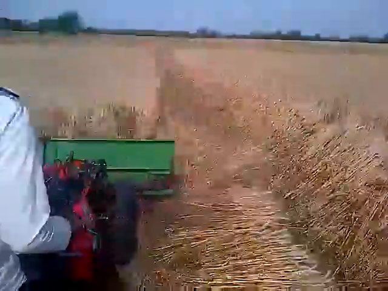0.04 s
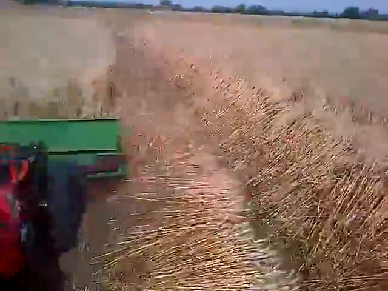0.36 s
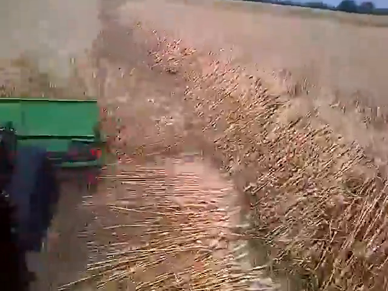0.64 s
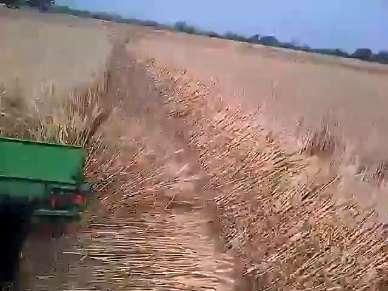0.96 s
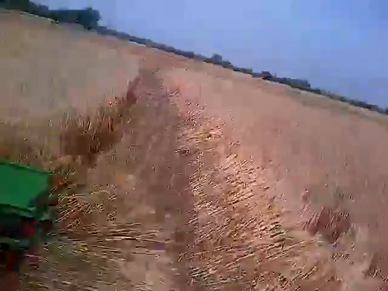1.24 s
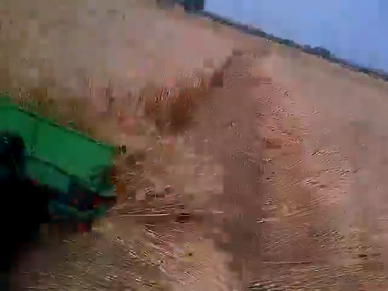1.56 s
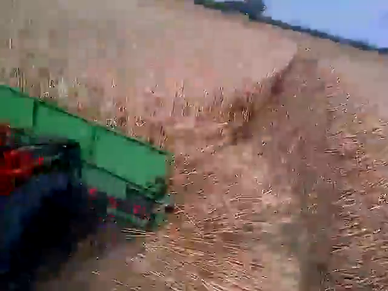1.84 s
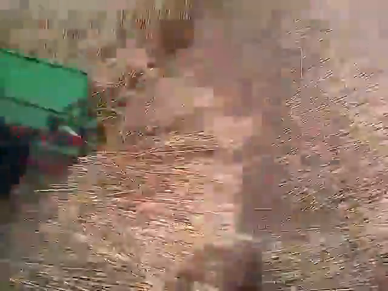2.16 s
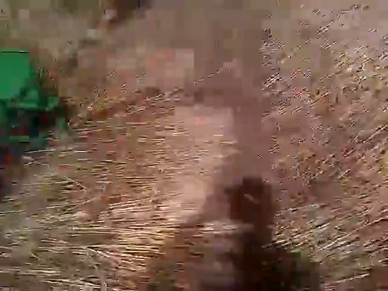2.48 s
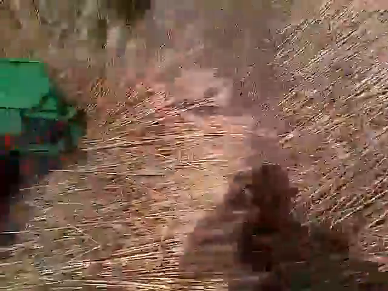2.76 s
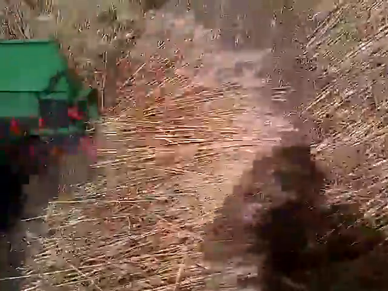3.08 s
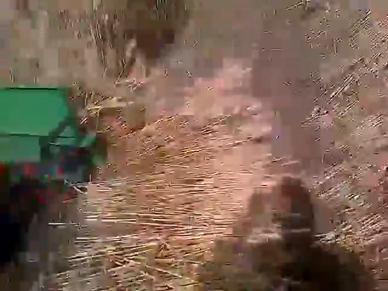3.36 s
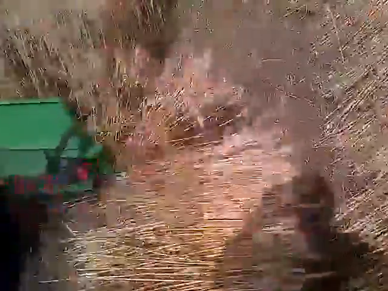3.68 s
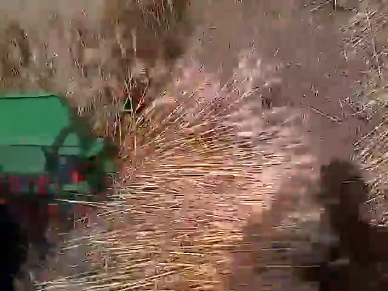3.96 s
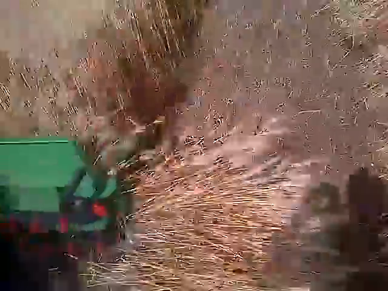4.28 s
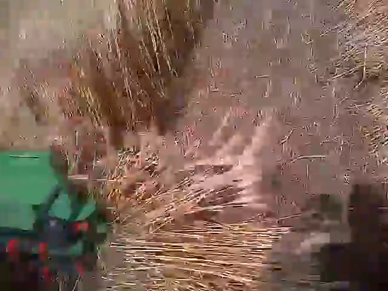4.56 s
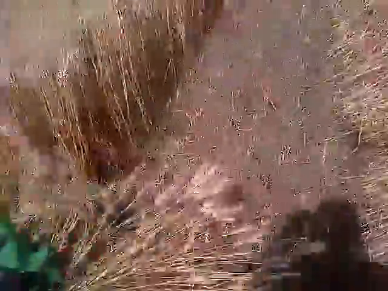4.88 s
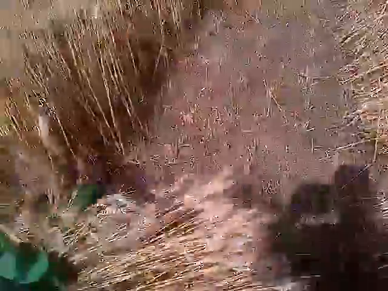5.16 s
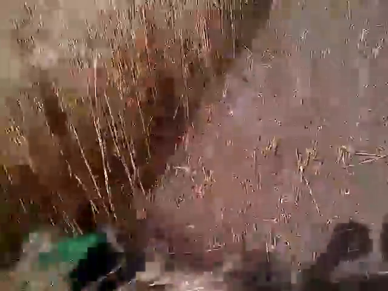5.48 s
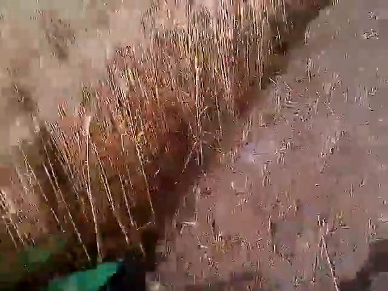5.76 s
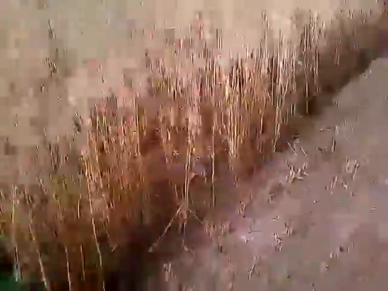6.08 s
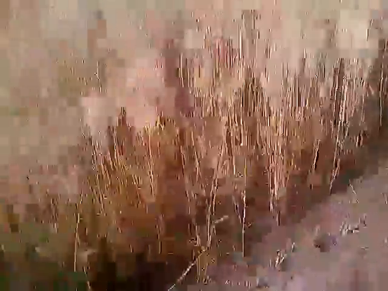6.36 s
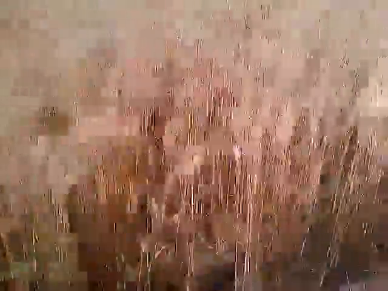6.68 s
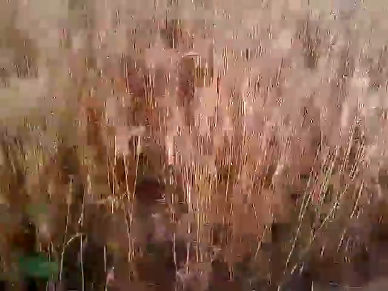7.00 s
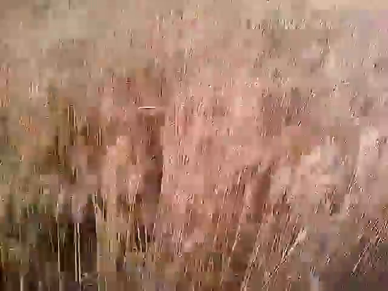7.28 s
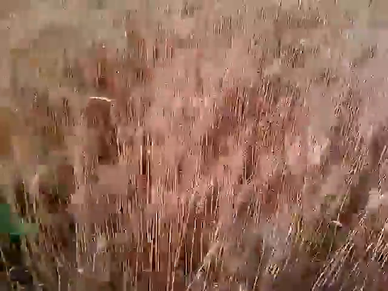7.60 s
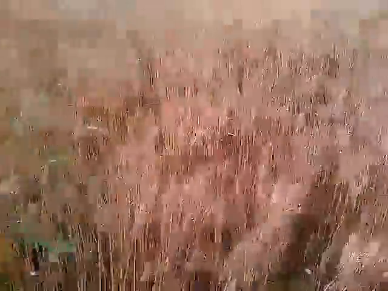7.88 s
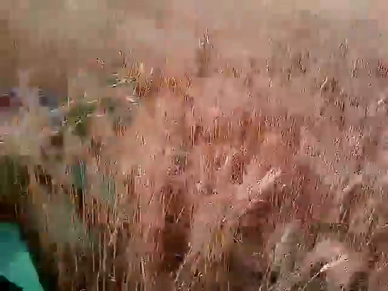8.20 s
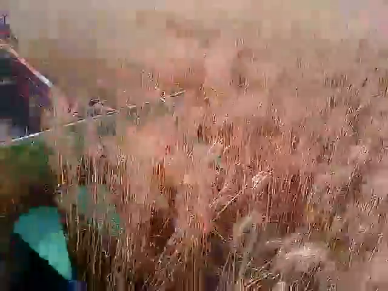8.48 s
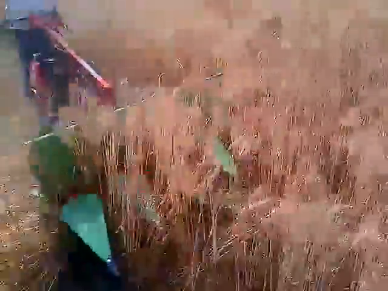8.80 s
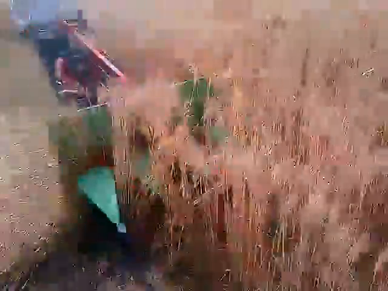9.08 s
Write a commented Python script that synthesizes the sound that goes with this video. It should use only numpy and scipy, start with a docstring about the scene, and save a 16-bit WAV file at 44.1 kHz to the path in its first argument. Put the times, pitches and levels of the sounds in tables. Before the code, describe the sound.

Heard from a small microphone carried close beside it, a diesel reaper pounds away with a rapid, even knock and exhaust throb. Chains and sheet-metal guards rattle continuously while dry straw hisses across the blade. Past the middle, standing wheat brushes the microphone in short crackles. The highs then drop away briefly, as though the microphone were covered, and return as the machine keeps running in the field.

```python
"""Walking past a reaper in dry wheat.

The microphone is carried along a walk-behind reaper, from engine to cutter bar, passing most parts within
a metre. The single-cylinder diesel fires 23 times a second: knock, piston slap, exhaust puff, intake pop.
Covers ring, chains and guards rattle, and straw hisses over the knife.
Late in the walk stalks brush the microphone, and the sound is muffled for about a second."""
import sys
import numpy as np
from scipy import signal
from scipy.fft import rfft, irfft, next_fast_len
from scipy.io import wavfile
from scipy.ndimage import uniform_filter1d

SR = 44100
rng = np.random.default_rng(int(sys.argv[2]) if len(sys.argv) > 2 else 0)


def store_wav(level_fs):
    """Save 16-bit WAV to argv[1]."""
    pcm = np.round(np.clip(np.atleast_2d(level_fs), -1, 1) * 32767)
    wavfile.write(sys.argv[1], SR, pcm.T.astype(np.int16))


N = 407484
TIME = np.arange(N) / SR
START_S = .036  # silent until here
WALK_M_PER_S = .3


def gain_of(db):
    """Decibels to amplitude."""
    return 10 ** (np.asarray(db) / 20)


def evened(x):
    """Scales to rms 1."""
    return x / np.sqrt(np.mean(x ** 2) + 1e-20)


def follow(curve):
    """A curve of (seconds, value) points, at every sample."""
    return np.interp(TIME, *np.transpose(curve))


def swell(s, half_length):
    """A smooth rise and fall around s seconds, 1 at the top."""
    return np.exp(-((TIME - s) / half_length) ** 2)


def near(place, distance):
    """Sound falls as 1 / distance while the microphone passes a part; 1 when closest."""
    return distance / np.hypot(distance, WALK_M_PER_S * TIME - place)


def surge(depth_db, hz):
    """A gain that wanders at random, at rates up to hz, as when the crop feeds unevenly."""
    coarse = TIME[::256]
    wander = sum(np.sin(2 * np.pi * (f * coarse + rng.random())) for f in np.geomspace(hz / 8, hz, 20))
    return gain_of(depth_db * np.interp(TIME, coarse, evened(wander)))


def colour(x, points):
    """Causal filter whose spectrum follows the (Hz, dB) points; rms 1."""
    size = next_fast_len(N + 8192)
    hz, db = np.transpose(points)
    bin_hz = abs(np.fft.fftfreq(size, 1 / SR))
    log_gain = np.log(gain_of(np.interp(np.log(bin_hz + 1), np.log(hz), db)))
    minimum_phase = np.exp(signal.hilbert(log_gain).conj())[:size // 2 + 1]
    return evened(irfft(rfft(x, size) * minimum_phase, size)[:N])


def ring(x, modes):
    """A bank of (Hz, width in Hz, dB) resonances; rms 1."""
    return evened(sum(gain_of(db) * signal.lfilter(*signal.iirpeak(hz, hz / width, SR), x)
                      for hz, width, db in modes))


def band(x, hz, width):
    """A single resonance; rms 1."""
    return ring(x, [(hz, width, 0)])


def sing(drive, modes):
    """Resonances that each swell and fade along their own stretch of the walk."""
    return sum(gain_of(db) * swell(s, half_length) * band(band(drive, hz, width), hz, 5 * width)
               for hz, width, db, s, half_length in modes)


def grains(per_s, spread_db):
    """Random tiny impacts, mostly weak and a few strong; rms 1."""
    size = gain_of(spread_db * np.minimum(rng.exponential(1, N), 4))
    return evened(size * rng.choice([-1, 1], N) * (rng.random(N) < per_s / SR))


def recurring(cycles, repeat, count=24):
    """Noise of which a share repeats with every engine cycle, its pattern renewed over count cycles."""
    steps = 1900  # per cycle
    pattern = uniform_filter1d(rng.standard_normal((int(cycles[-1]) + 2, steps)), count, axis=0, mode="wrap")
    locked = evened(pattern[cycles.astype(int), (cycles % 1 * steps).astype(int)])
    return np.sqrt(repeat) * locked + np.sqrt(1 - repeat) * rng.standard_normal(N)


def stroke(cycles, at, rise, decay, uneven_db):
    """The envelope of one uneven burst a cycle; at, rise and decay are shares of the cycle."""
    since = cycles - at + 2
    strength = gain_of(uneven_db * rng.standard_normal(256))[since.astype(int)]
    return strength * (1 - np.exp(-(since % 1) / rise)) * np.exp(-(since % 1) / decay)


def tap(cycles, at, scatter, uneven_db):
    """One sharp impact a cycle; its place in the cycle and its strength vary a little."""
    slip, size = rng.standard_normal((int(cycles[-1]), 2)).T
    place = np.searchsorted(cycles, np.arange(len(slip)) + at + scatter * slip)
    return np.bincount(place, gain_of(uneven_db * size), N + 1)[:N]


def puffing(cycles):
    """Four gusts of gas a cycle: the valve cracks open, the piston pushes, and the pipe surges twice."""
    # Each row: place in the cycle from 0 to 1, strength in dB.
    puffs = [(.56, 0), (.76, 0), (.97, -4), (.16, -5)]
    return sum(gain_of(db) * stroke(cycles, at, rise=.015, decay=.055, uneven_db=.7) for at, db in puffs)


def lull(cycles):
    """The running gear quietens as the piston slows against compression, just before the knock."""
    return 1 - .33 * np.exp(-((cycles % 1 - .35) / .09) ** 2)


def sweep(cycles):
    """The knife shears on its way out and, more weakly, on its way back."""
    out = stroke(cycles, at=.94, rise=.02, decay=.13, uneven_db=1.8)
    return out + .55 * stroke(cycles, at=.24, rise=.015, decay=.09, uneven_db=1.8)


def brushes():
    """Standing stalks brush past the microphone: each catches suddenly and scrapes off in a dry crackle."""
    # Each row: start in seconds, decay in seconds, centre in Hz, level in dB.
    stalks = [(5.985, 0.055, 3350, -20), (6.095, 0.097, 3070, -21.5), (6.27, 0.047, 2430, -18),
              (6.84, 0.35, 1880, -24.5), (7.03, 0.052, 1680, -24), (7.326, 0.04, 2770, -19),
              (7.365, 0.058, 2740, -21), (7.465, 0.019, 2970, -19.5), (7.563, 0.056, 1620, -18.5),
              (7.735, 0.028, 1670, -20), (7.866, 0.095, 1060, -26.5), (8.171, 0.033, 1700, -44),
              (8.35, 0.037, 1540, -28)]
    rise_s = .001
    scrape = grains(per_s=1800, spread_db=3) + .5 * rng.standard_normal(N)
    out = np.zeros(N)
    for s, decay, hz, db in stalks:
        since = np.maximum(TIME - s, 0)
        envelope = (1 - np.exp(-since / rise_s)) * np.exp(-(since / decay) ** 2)
        out += gain_of(db) * envelope * band(band(scrape, hz, hz / 2), hz, hz / 2)
    return out


def flicks():
    """Stalks flick the microphone itself, each with a dry tick of a few milliseconds."""
    # Each row: start in seconds, relative strength in dB.
    stalks = [(6.193, -4), (6.197, -5), (6.681, -15)]
    spectrum = [(30, -13), (300, -13), (1500, 13), (4000, -4), (7500, -14), (9000, -46)]
    push = sum(gain_of(db) * (TIME >= s) * np.exp(-abs(TIME - s) / .0015) for s, db in stalks)
    return .7 * np.std(push) * colour(push * rng.standard_normal(N), spectrum)


def straw(cycles, blows):
    """Dry stalks snap and slide over the knife."""
    # Each row: frequency in Hz, relative level of the hiss in dB.
    spectrum = [(1500, -39), (3200, -4), (4100, -10.5), (4800, -4), (5650, -4.5), (5800, -11.5),
                (6600, -13.5), (7100, -21), (7700, -46)]
    slide = (.75 + .7 * sweep(cycles)) * rng.standard_normal(N)
    crackle = slide + .45 * grains(per_s=1500, spread_db=2.8)
    return colour(crackle * surge(depth_db=1.5, hz=20) + .16 * blows, spectrum)


def knife(cycles):
    """The knife steel rubs in its guides with a thin, sustained squeal that swells on each sweep."""
    # Each row: pitch and width in Hz, level in dB, middle and half length in seconds.
    squeals = [(5420, 25, -39, .28, .15), (5425, 35, -34, .72, .08), (5680, 50, -38, .7, .8),
               (5430, 30, -41, 1.3, .2), (5520, 110, -31.5, 2.94, .15), (5670, 50, -39.5, 4.0, 1.2),
               (5190, 35, -41, 4.9, 1.2), (5420, 30, -40, 4.4, .8), (5520, 50, -40, 4.0, .9)]
    return sing((1 + .7 * sweep(cycles)) * recurring(cycles, repeat=.5), squeals)


def hums(cycles):
    """The tailpipe and a cover hum on multiples of the firing rate and throb with the gas flow."""
    # Each row: multiple of the firing rate, level in dB, middle and half length in seconds.
    notes = [(16, -28.5, 3.5, .4), (16, -32, 4.3, .6), (16, -37, 6.0, 1.1), (17, -34.5, 3.9, 1.5),
             (28, -38, 6.0, 1.6), (31, -37, 5.6, 1.8), (53, -39.5, 1.4, .6), (53, -37.5, 4.3, 1.5)]
    throb = 1 + .4 * np.cos(2 * np.pi * (cycles - .85))
    out = np.zeros(N)
    for multiple, db, s, half_length in notes:
        tone = throb * np.sin(2 * np.pi * multiple * cycles) * surge(depth_db=1, hz=5)
        out += gain_of(db) * swell(s, half_length) * evened(tone)
    return out


def frame(cycles, blows):
    """The frame drones under the engine's blows and the churning drive."""
    # Each row: frequency in Hz, relative level of the drone in dB.
    spectrum = [(200, -41), (400, -20), (540, -5), (645, 2), (700, -4), (820, 2), (950, 0.5), (1100, 1),
                (1400, -19), (2500, -42.5)]
    return colour(recurring(cycles, repeat=.42) + .22 * blows, spectrum)


def cutter_table(cycles):
    """The broad cutter table drones as crop is dragged across it; the drone swells briefly at moments."""
    # Each row: resonance and its width in Hz, relative level in dB.
    modes = [(406, 256, 3), (513, 140, -19)]
    # Each row: time in seconds, rise in dB.
    swells = [(1.17, 10), (3.56, 7), (5.7, 6.5), (7.57, 3), (8.87, 3), (9.07, 3.5), (9.2, 2.5)]
    level = gain_of(sum(db * swell(s, .05) for s, db in swells))
    shaking = (puffing(cycles) + .8) * recurring(cycles, repeat=.22)
    return level * band(ring(shaking, modes), 404, 180)


def chains(cycles, blows):
    """Chain links and tappets rattle, shaken by each firing, and set the sprockets ringing."""
    # Each row: frequency in Hz, relative level of the rattle in dB.
    spectrum = [(900, -34.5), (1800, -19), (2300, -0.5), (2900, 1), (3600, -4.5), (4200, -7.5),
                (5500, -32.5), (7500, -45)]
    # Each row: resonance and its width in Hz, relative level in dB.
    sprockets = [(2560, 91, 7.5), (2990, 220, 0), (3490, 560, 2.5)]
    # Hard rattles of the conveyor chain. Each row: start in seconds, dB over its usual clinking.
    clanks = [(4.085, 12), (5.389, 8)]
    tappets = stroke(cycles, at=.97, rise=.03, decay=.17, uneven_db=2)
    links = (.93 + .4 * tappets) * recurring(cycles, repeat=.35) + .5 * grains(per_s=700, spread_db=4.5)
    rattle = colour(links * lull(cycles) * surge(depth_db=.8, hz=16) + .55 * blows, spectrum)
    jolts = 1 + sum(gain_of(db) * (TIME >= s) * np.exp(-abs(TIME - s) / .028) for s, db in clanks)
    clinks = band(ring(jolts * grains(per_s=260, spread_db=3), sprockets), 3280, 1500)
    return evened(rattle + .52 * clinks)


def guards(cycles):
    """Knife and conveyor lugs clatter against loose sheet-metal guards, which at moments shake harder."""
    # Each row: resonance and its width in Hz, relative level in dB.
    modes = [(1120, 880, -10.5), (1266, 92, 0), (1472, 410, 1), (1844, 31, -1), (2177, 650, -0.5)]
    # Each row: time in seconds, change of level in dB.
    shakes = [(.66, 3), (6.17, 1), (7.58, 0), (9.19, -0.5)]
    shake = gain_of(sum(db * swell(s, .05) for s, db in shakes))
    clatter = 3.7 * recurring(cycles, repeat=.23) + grains(per_s=690, spread_db=7)
    uneven = surge(depth_db=.9, hz=18) * lull(cycles)
    return shake * band(ring(uneven * clatter, modes), 1624, 670)


def panels(cycles, blows):
    """Knocks and running gear keep the covers singing; each beams its note at a stretch of the walk."""
    # Each row: pitch and width in Hz, level in dB, middle and half length in seconds.
    notes = [(1225, 18, -36.5, 1.1, 1.2), (1428, 22, -32, .6, .7), (1640, 25, -28, .65, .4),
             (1715, 24, -27, .9, .55), (1775, 20, -30, .65, .4), (1779, 22, -31.5, 2.1, .8),
             (1962, 22, -34, .4, .45), (1950, 40, -30, 2.8, .6), (2219, 22, -31, 2.1, .6),
             (2130, 60, -31, 3.1, .5), (2140, 45, -32, 1.6, .6), (1630, 35, -30, 2.85, .35),
             (1720, 35, -29.5, 2.7, .45), (1860, 35, -31, 2.6, .5), (1635, 55, -29.5, 4.1, .6),
             (1545, 35, -28.5, 4.9, .8), (2000, 400, -26, 2.35, .4), (745, 35, -33, 1.0, .7),
             (2595, 40, -33, 1.0, .9), (2990, 130, -30, 1.7, .6), (3975, 45, -37.5, 1.8, .9),
             (1548, 32, -27, 7.1, .9), (2260, 60, -33, 5.6, 1.1), (2990, 45, -31.5, 4.9, .6),
             (2530, 90, -31, 4.6, .8), (500, 70, -35, 4.4, 2.2), (1440, 45, -24, 9.1, .25),
             (1570, 55, -21, 9.22, .09), (2150, 300, -22.5, 9.24, .11)]
    thump = evened(tap(cycles, at=.44, scatter=.002, uneven_db=1))
    return sing(.45 * thump + .4 * blows + lull(cycles) * recurring(cycles, repeat=.45), notes)


def piston_slap(cycles):
    """Just after each firing the piston slaps with a short, bright chatter."""
    slap = tap(cycles, at=.518, scatter=.002, uneven_db=1.3)
    chatter = stroke(cycles, at=.5, rise=.015, decay=.11, uneven_db=1) * recurring(cycles, repeat=.6)
    return band(band(.7 * evened(slap) + evened(chatter), 2220, 420), 2100, 1300)


def tank(cycles):
    """The fuel tank clanks firmly at each firing and buzzes faintly as it rings out."""
    # Each row: resonance and its width in Hz, relative level in dB.
    modes = [(1720, 40, -4), (1975, 46, 0), (2110, 90, -5)]
    blow = tap(cycles, at=.432, scatter=.0015, uneven_db=.6)
    buzz = stroke(cycles, at=.5, rise=.02, decay=.2, uneven_db=.8) * recurring(cycles, repeat=.4)
    return band(ring(evened(blow) + .35 * evened(buzz), modes), 1900, 700)


def intake(cycles):
    """A pressure pop in the air pipe, one crank turn after the firing, with its echo and a gulp of air."""
    pop = tap(cycles, at=.984, scatter=.0015, uneven_db=1)
    echo = .18 * tap(cycles, at=.05, scatter=.004, uneven_db=2)
    gulp = stroke(cycles, at=.98, rise=.01, decay=.07, uneven_db=2) * recurring(cycles, repeat=.7)
    return band(band(evened(pop + echo) + .2 * evened(gulp), 710, 700), 654, 380)


def exhaust(cycles, pipe_gain, shell_gain):
    """The valve cracks open after the power stroke, and the gusts ring the pipe and the silencer shell."""
    # Each row: frequency in Hz, relative level at the pipe in dB.
    spectrum = [(20, -26.5), (110, -28.5), (160, -41), (210, -14.5), (275, -1.5), (325, 3.5), (380, 5.5),
                (440, 2.5), (520, -1.5), (700, -18.5), (2000, -58)]
    blowdown = tap(cycles, at=.585, scatter=.003, uneven_db=1.5)
    gusts = (puffing(cycles) + .3) * recurring(cycles, repeat=.68, count=14)
    gas = evened(gusts) + .15 * evened(blowdown)
    shell = band(band(gas, 320, 117), 318, 117)
    return pipe_gain * colour(gas, spectrum) + shell_gain * shell


def cylinder_head(cycles):
    """Each firing opens with one hard, even blow that rings the cylinder head briefly."""
    # Each row: resonance and its width in Hz, relative level in dB.
    modes = [(1450, 170, -3), (1750, 130, -1), (2020, 150, 0), (2560, 220, -2), (3050, 300, -3)]
    blow = tap(cycles, at=.434, scatter=.001, uneven_db=.7)
    return band(ring(blow, modes), 2100, 2600)


def crankcase(blows):
    """Close to the crankcase each knock has a short, compact clang."""
    return band(band(blows, 2070, 380), 1970, 940)


def block(blows):
    """The engine casting rings with each knock."""
    # Each row: resonance and its width in Hz, relative level in dB.
    modes = [(743, 19, -1), (1225, 22, -7), (1422, 60, -8), (1640, 40, -5), (1720, 55, -2),
             (1780, 32, -2.5), (1962, 48, -2), (1960, 430, -4), (2219, 34, -6)]
    return band(ring(blows, modes), 1950, 3000)


def knock(cycles):
    """Combustion hits the block, the piston slaps the liner twice, and the gears rattle on."""
    hits = tap(cycles, at=.445, scatter=.001, uneven_db=.6)
    hits += .6 * tap(cycles, at=.505, scatter=.002, uneven_db=1)
    hits -= .65 * tap(cycles, at=.53, scatter=.002, uneven_db=1)
    burn = stroke(cycles, at=.437, rise=.004, decay=.05, uneven_db=.9)
    slap = stroke(cycles, at=.505, rise=.008, decay=.075, uneven_db=1.1)
    gears = stroke(cycles, at=.64, rise=.03, decay=.25, uneven_db=1.5)
    envelope = 1.15 * burn + .95 * slap + .33 * gears + .13
    shudder = evened(envelope * recurring(cycles, repeat=.72, count=36))
    return evened(.4 * evened(hits) + .9 * shudder)


def muffled(x):
    """The treble shuts out quickly and returns slowly, as if something covered the microphone."""
    # Each row: frequency in Hz, gain in dB when fully muffled.
    losses = [(250, -3), (430, -2.5), (750, -6), (1250, -13.5), (1900, -16), (3000, -20), (4200, -23),
              (5500, -10), (7000, -16)]
    from_s, close_s, hold_s, open_s = 7.78, .067, .64, .72
    hz, s, spectra = signal.stft(x, SR, nperseg=512, noverlap=384)
    since = np.maximum(s - from_s, 0)
    closing = 1 - np.exp(-since / close_s)
    opening = np.clip((since - hold_s) / open_s, 0, 1) ** 2
    points_hz, points_db = np.transpose(losses)
    loss_db = np.interp(np.log(hz + 1), np.log(points_hz), points_db)
    spectra *= gain_of(np.outer(loss_db, closing * (1 - opening)))
    return signal.istft(spectra, SR, nperseg=512, noverlap=384)[1][:N]


def scene():
    """One crankshaft times all the parts, and each swells as the microphone passes it."""
    # Each row: time in seconds, firings per second.
    speed = [(0.0, 23.309), (0.41, 23.058), (1.07, 23.288), (1.36, 23.238), (1.61, 23.045), (2.23, 23.136),
             (2.93, 22.974), (3.26, 23.157), (3.88, 22.996), (5.28, 23.513), (5.98, 23.07), (6.31, 23.307),
             (6.56, 23.144), (6.89, 23.287), (7.96, 22.894), (9.24, 23.475)]
    # Each part: place along the walk in metres, closest distance in metres, base level there in dB. The entry
    # "gearbox" is where the piston slap is heard from.
    parts = {"block": (0.65, 0.79, -25), "head": (.39, .17, -25.3), "tank": (.1, .24, -23),
             "gearbox": (1.95, .26, -27.5), "silencer": (0.15, 1.2, -32.5), "exhaust": (1.05, 0.22, -28),
             "crankcase": (1.02, .13, -28), "chains": (1.66, 1.98, -21.5), "intake": (1.66, .64, -25.8),
             "table": (2.37, 0.52, -26.5), "frame": (4.1, 4.5, -25.5), "guards": (4.35, 0.76, -11)}
    # Silencer boom and intake pop briefly swell or drop. Each row: time in seconds, boom in dB, pop in dB.
    swings = [(.22, 6, -0.5), (.62, 4.5, 0), (1.17, 0.5, 5), (1.62, 3, -23), (1.92, 0, 0.5), (2.26, 3, 4.5),
              (3.0, 5, -11), (3.6, -4, -15), (3.9, 5.5, -1.5), (4.24, 4.5, -3), (4.75, 2, -3.5),
              (5.15, 2, 1), (5.4, 0, -1), (5.7, 4, -2), (6.12, 1, 1), (7.0, 0, 0.5), (7.72, -2, 7.5)]
    # Spells of harder knocking. Each row: middle and half length in seconds, change in dB.
    hard_spells = [(0.24, 0.41, 0.5), (0.632, 0.12, 0), (1.333, 0.093, 1), (2.199, 0.09, 5),
                   (2.754, 0.63, -0.5), (3.551, 0.12, 3)]
    # Each row: time in seconds, relative level of the straw hiss in dB.
    hiss = [(0.1, -32), (0.7, -33.5), (0.95, -35), (1.3, -31), (1.8, -36.5), (2.7, -35.5), (2.92, -29.5),
            (3.15, -33), (4.75, -30), (5.4, -33), (6.18, -32), (6.26, -37), (6.55, -39.5), (7.2, -47),
            (7.7, -43.5)]
    cycles = np.cumsum(follow(speed)) / SR + .708
    heard = {name: gain_of(db) * near(place, distance) for name, (place, distance, db) in parts.items()}
    boom_gain = gain_of(sum(db * swell(s, .1) for s, db, _ in swings))
    pop_gain = gain_of(sum(db * swell(s, .1) for s, _, db in swings))
    pop_fade = gain_of(-5 * swell(8.4, .75))  # the intake pop fades while the sound is muffled
    hard = gain_of(sum(db * swell(s, half_length) for s, half_length, db in hard_spells))
    hiss_db = follow(hiss)
    load = gain_of(.51 * (hiss_db - np.median(hiss_db)))  # the chains grow louder with the straw
    blows = knock(cycles)
    felt = blows * hard * near(*parts["block"][:2])  # the knock travels through the whole machine

    mix = exhaust(cycles, heard["exhaust"], heard["silencer"] * boom_gain) + hums(cycles)
    mix += heard["crankcase"] * crankcase(blows)
    mix += heard["table"] * cutter_table(cycles)
    mix += heard["frame"] * frame(cycles, felt)
    mix += heard["intake"] * pop_gain * pop_fade * intake(cycles)
    mix *= gain_of(-3 * swell(6.43, .22))  # the low roar dips briefly
    mix += heard["head"] * cylinder_head(cycles) + heard["tank"] * tank(cycles)
    mix += heard["gearbox"] * piston_slap(cycles)
    mix += heard["block"] * hard * block(blows) + panels(cycles, blows)
    mix += heard["guards"] * guards(cycles)
    mix += heard["chains"] * load * chains(cycles, felt)
    mix += gain_of(hiss_db + 1.5) * straw(cycles, felt) + knife(cycles)
    mix *= gain_of(-2.5 * swell(3.78, .06))  # the whole sound dips briefly
    fade_in = gain_of(-4.5 * np.exp(-np.maximum(TIME - START_S, 0) / .11))
    return (fade_in * (muffled(mix + flicks()) + brushes()))[None]


def record(dry):
    """A small mono voice-band microphone: peaks are rounded and the treble rolls off."""
    ceiling, roll_off_hz, edge_hz = 1.05, 6700, 7500
    rounded = ceiling * np.tanh(dry / ceiling) * (TIME >= START_S)
    gentle = signal.firwin(41, roll_off_hz, fs=SR)
    steep = signal.firwin(255, edge_hz, window=("kaiser", 9), fs=SR)
    dull = signal.oaconvolve(rounded, gentle[None], "same")
    return signal.oaconvolve(dull, steep[None], "same")


dry = scene()
out = record(dry)
store_wav(out)
```